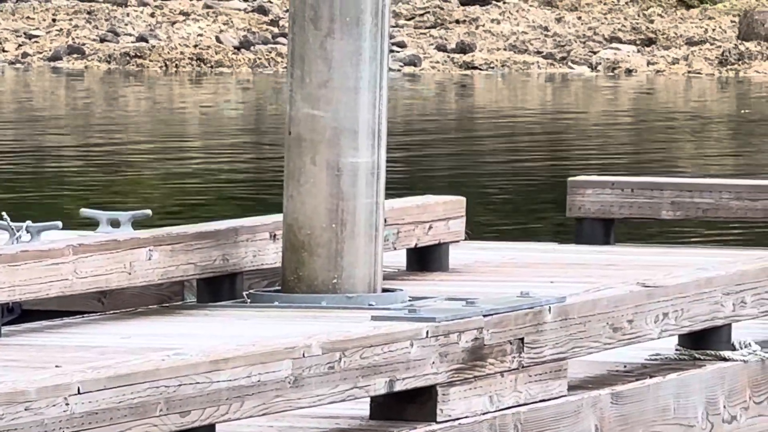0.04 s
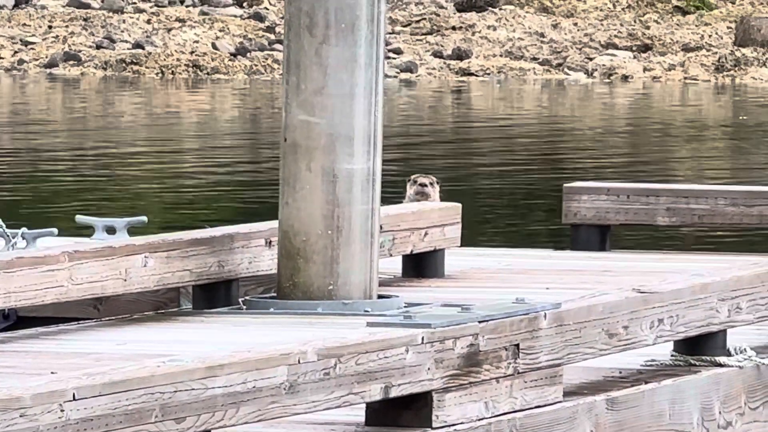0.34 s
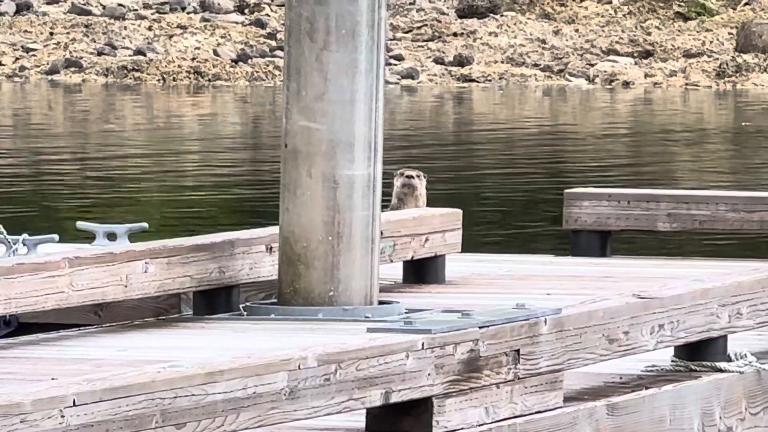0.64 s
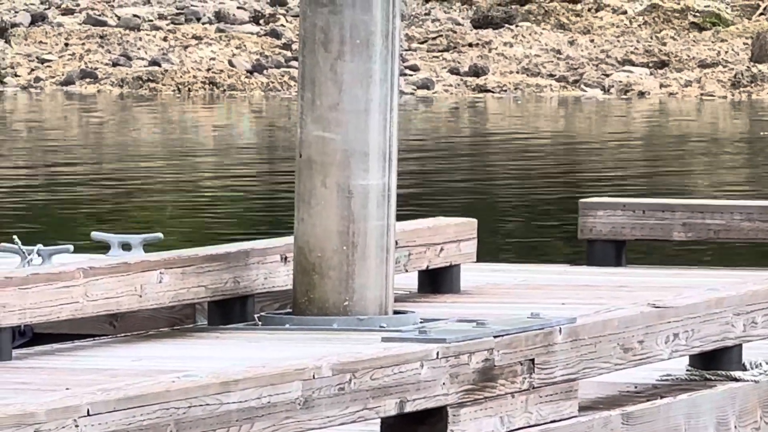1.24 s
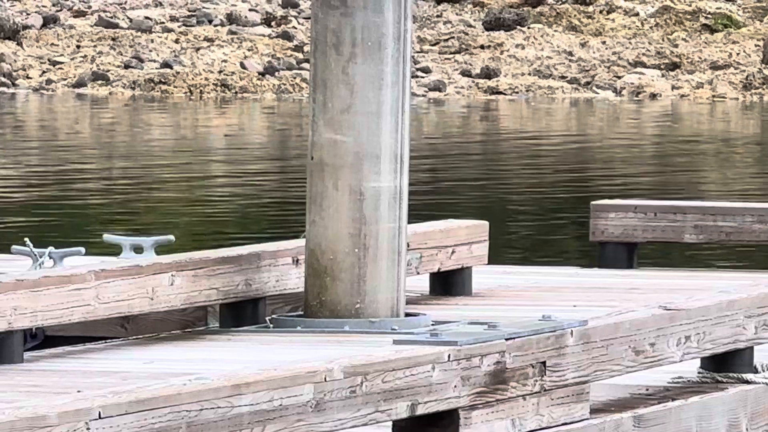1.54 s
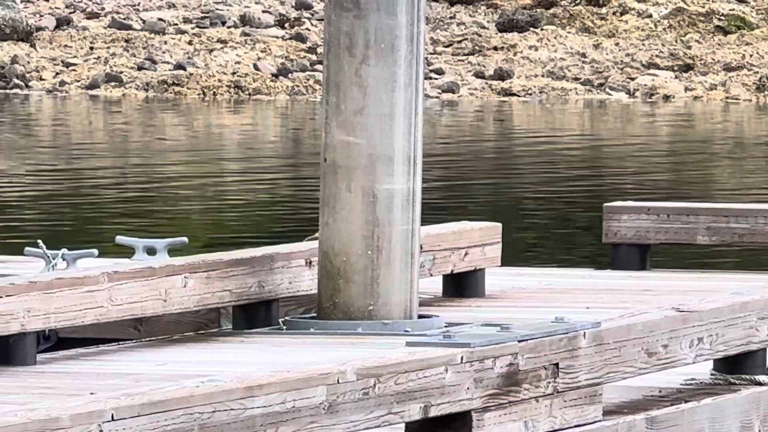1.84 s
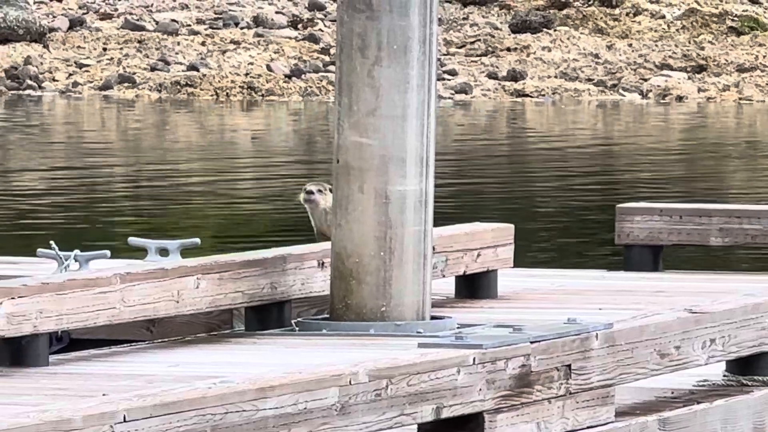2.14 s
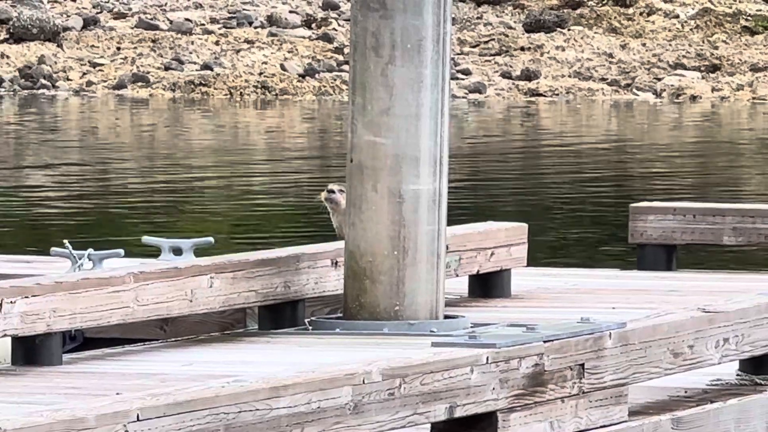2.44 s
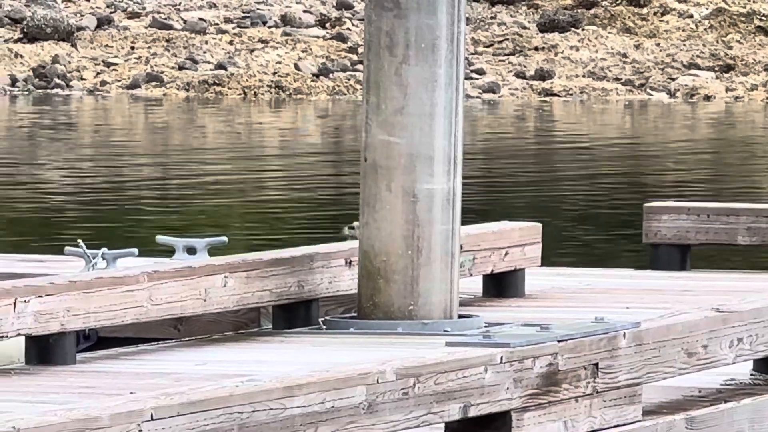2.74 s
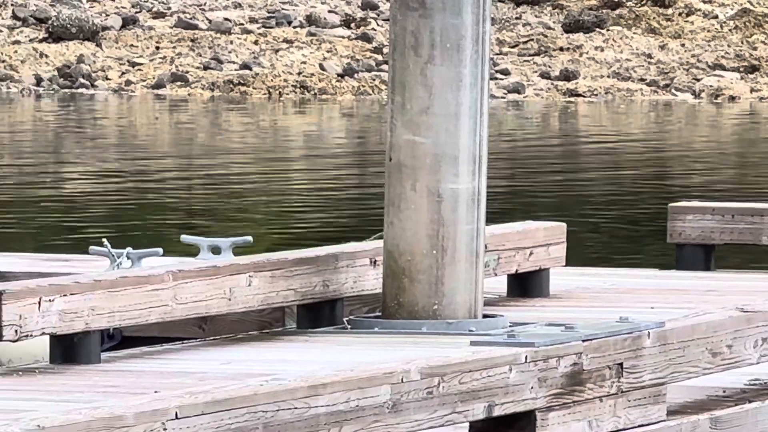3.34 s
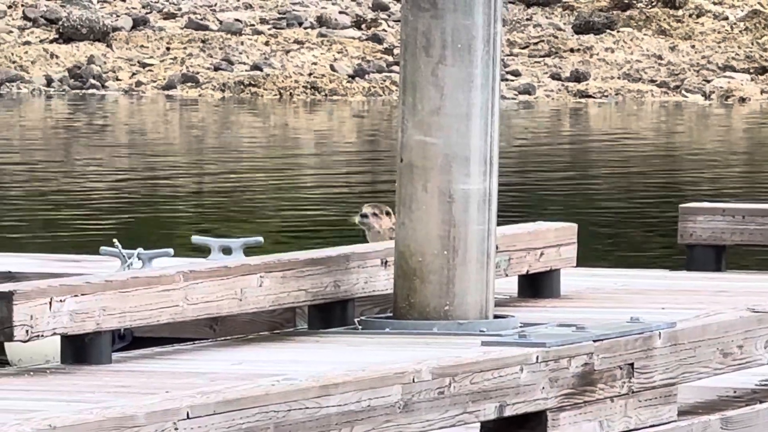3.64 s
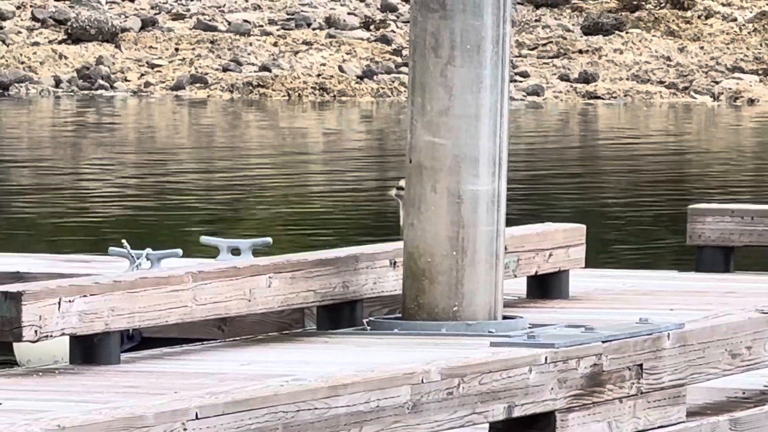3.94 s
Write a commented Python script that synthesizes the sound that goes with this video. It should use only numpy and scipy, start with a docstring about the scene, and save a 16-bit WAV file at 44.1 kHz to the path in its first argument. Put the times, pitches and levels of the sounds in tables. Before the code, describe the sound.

A breeze on the microphone grows into low, uneven buffeting beside calm water. Small plops under a dock come first, then a sharp, gritty knock nearby, with faint scuffs, a thin far-off bird whistle and a small metal clink.

```python
"""On a wooden dock over calm water, stereo microphone open to a light breeze. Water plops under the
boards, soft scuffs start close by, and a distant bird's thin whistle creeps in. Just past one second,
something near gives one sharp, gritty knock that the shore echoes. The whistle swells and the bird adds
a few slurs. The breeze grows, a small metal fitting clinks to the right, and to the end gusts rumble
and eddies puff on the microphone."""
import sys
import numpy as np
from scipy import signal
from scipy.fft import rfft, irfft, next_fast_len
from scipy.io import wavfile
from scipy.ndimage import uniform_filter1d, map_coordinates

SR = 44100
rng = np.random.default_rng(int(sys.argv[2]) if len(sys.argv) > 2 else 0)


def generate_wav(sig):
    """Save sig (samples, or channels by samples) to the path in sys.argv[1] as 16-bit PCM at SR."""
    pcm = np.round(np.clip(np.atleast_2d(sig).T, -1, 1) * 32767).astype(np.int16)
    wavfile.write(sys.argv[1], SR, pcm)


N = 176400

# Noise spectra, each relative within itself: f/Hz, level/dB
AIR_SPECTRUM = [(150, -36), (280, -6), (400, -5), (624, -7.5), (1000, -13.5), (2360, -16.5), (4240, -28),
                (5800, -26.5), (10000, -39.5), (15500, -50)]
RUMBLE_SPECTRUM = [(22, -33.5), (35, -15), (52, 5), (76, 3), (100, -1), (150, -15), (300, -30),
                   (600, -47.5), (1200, -93.5)]
FLUTTER_SPECTRUM = [(80, -19.5), (170, 10.5), (330, -5), (550, -21.5), (1500, -68)]
SCUFF_BODY_SPECTRUM = [(300, -24), (700, 1), (1700, -5), (2600, -7), (4000, -15.5), (8000, -36.5)]
SCUFF_GRIT_SPECTRUM = [(1500, -21.5), (3000, -3), (4400, 9), (6300, 6), (9300, -0.5), (11500, -42.5),
                       (15000, -4)]
CRACK_SPECTRUM = [(500, -21), (2000, -14), (5000, 15.5), (13500, 3.5)]
KNOCK_SPECTRUM = [(400, 4.5), (700, -21), (1400, -18.5), (1960, -8.5), (3110, -12), (4090, -20), (5150, 0),
                  (6470, -9.5), (13000, -21), (15500, -20)]
THUD_SPECTRUM = [(50, -4), (100, 8.5), (220, -3), (450, -19.5), (1000, -20.5), (2000, -58.5)]
# Stereo width at the microphone: f/Hz, side over mid/dB
STEREO_WIDTH = [(200, -69), (400, -15), (800, -8.5), (1400, 5), (2400, -4.5), (4400, -19.5), (6500, -11.5),
                (8200, 1.5), (15000, -2)]
# Lean of the wash and scuffs: f/Hz, left boost and right cut/dB
LEAN = [(400, 1), (1200, -2.5), (2400, 0.5)]
# Wash of the open water: t/s, level/dB
AIR_LEVELS = [(0, -66.5), (.3, -72), (1.0, -73.5), (1.5, -69.5), (1.9, -73.5), (3, -72)]
# Breeze at the microphone: t/s, level/dB
WIND_STRENGTH = [(0.0, -32.5), (0.04, -54), (0.57, -49.5), (0.63, -70), (0.699, -50), (0.9, -61),
                 (1.05, -52.5), (1.09, -61), (1.199, -39.5), (1.23, -57), (1.288, -43), (1.48, -72),
                 (1.588, -39), (1.67, -53), (2.14, -51), (2.23, -32), (2.26, -53.5), (2.331, -32.5),
                 (2.36, -47), (2.421, -25.5), (2.48, -39.5), (2.761, -25.5), (3.02, -35.5), (3.123, -32),
                 (3.158, -54.5), (3.24, -41), (3.371, -24), (3.44, -36.5), (3.499, -31), (3.78, -45.5),
                 (3.808, -30.5), (3.831, -46), (4.0, -43)]
# Plops under the boards: t/s, level/dB, starting f/Hz
PLOPS = [(0.061, -44, 341), (0.126, -55.5, 384), (.215, -51.5, 361), (0.264, -57, 393), (0.611, -58.5, 395)]
# Close rubs: t/s, rise/s, t60/s, body level/dB, grit level/dB, starting resonance f/Hz
SCUFF_STROKES = [(0.246, 0.0023, 0.07, -70.5, -91, 1198), (1.308, 0.008, 0.26, -66, -74.5, 1500),
                 (1.398, 0.017, 0.94, -68.5, -83, 1396), (1.65, 0.018, 0.094, -70, -107, 1353),
                 (2.003, 0.005, 0.35, -66, -74.5, 1450), (2.126, 0.017, 0.42, -71, -74, 1487),
                 (2.376, 0.006, 0.27, -73, -72.5, 1692), (2.415, .01, 0.13, -66, -61, 2496),
                 (2.811, 0.0079, 0.78, -68.5, -79, 1448), (3.025, 0.048, 0.54, -65, -81.5, 1502),
                 (3.547, .008, 0.2, -68, -74, 1505), (3.669, 0.03, 0.47, -68.5, -78, 1204)]
# The bird's held note: t/s, f/Hz, level/dB
WHISTLE_PATH = [(.7, 5270, -101), (1.42, 5250, -83), (1.52, 5275, -77.5), (1.6, 5270, -80),
                (1.635, 5335, -78), (1.71, 5255, -73), (1.79, 5265, -80), (1.89, 5230, -94)]
# Its short slurs: t/s, length/s, starting f/Hz, ending f/Hz, level/dB
BIRD_SLURS = [(1.79, .08, 6150, 6550, -84), (1.89, .045, 4950, 4150, -80), (1.94, .045, 5820, 5620, -79),
              (2.13, .035, 4900, 5050, -67.5)]
# Single eddies hitting the microphone: t/s, level/dB, f/Hz
STRONG_EDDIES = [(0.754, -43.5, 192), (1.032, -40, 208), (1.286, -45, 178), (1.583, -34.5, 563),
                 (1.751, -36, 287), (1.938, -44.5, 545), (2.041, -37.5, 440), (2.114, -43, 500),
                 (2.177, -38, 567), (2.319, -31.5, 197), (2.402, -24.5, 207), (2.460, -33, 543),
                 (2.500, -29, 900), (2.645, -20, 222), (2.731, -16, 148), (2.771, -19, 413),
                 (2.839, -26.5, 350), (2.856, -19.5, 230), (2.893, -18.5, 329), (2.906, -20, 210),
                 (2.986, -23.5, 256), (3.03, -29.5, 428), (3.258, -35, 403), (3.276, -28.5, 526),
                 (3.304, -27, 692), (3.316, -23.5, 120.3), (3.333, -20.5, 740), (3.378, -23, 254),
                 (3.496, -23.5, 138), (3.551, -20, 334), (3.608, -30, 259), (3.777, -25.5, 500),
                 (3.807, -28.5, 88.3), (3.865, -32, 255)]
# Resonances of the knock: f/Hz, width/Hz, relative level/dB
KNOCK_MODES = [(3020, 240, -4), (5080, 190, 3.5), (7000, 170, -5), (8100, 97, -3.5)]
# Partials of the metal fitting: f/Hz, relative level/dB, t60/s
CLINK_MODES = [(1688, 3, 0.095), (2162, -9.5, 0.07)]


def amp(db):
    """Decibels to gain."""
    return 10 ** (np.asarray(db) / 20)


def unit(x):
    """Scaled to rms 1."""
    return x / np.sqrt(np.mean(x ** 2) + 1e-20)


def along(points, hz):
    """(f/Hz, value) points read on a log axis."""
    f, v = np.transpose(points)
    return np.interp(np.log(hz + 1), np.log(f + 1), v)


def since(s):
    """Seconds since s, for every sample."""
    return np.arange(N) / SR - s


def curves(rows):
    """One value per sample for each column after the time."""
    s, *cols = np.transpose(rows)
    return [np.interp(since(0), s, c) for c in cols]


def wobble(rate):
    """A smooth random curve, rate knots a second."""
    return map_coordinates(rng.standard_normal(4096), [np.arange(N) * rate / SR], mode="wrap")


def filtered(x, response):
    """x times a response of frequency."""
    m = next_fast_len(N + SR // 4)
    return irfft(rfft(x, m) * response(np.fft.rfftfreq(m, 1 / SR)), m)[..., :N]


def shaped(gain):
    """Stereo noise of rms 1 with a gain per frequency: mono in the bass, widest in the middle."""
    def response(hz):
        return gain(hz) * np.array([np.ones_like(hz), amp(along(STEREO_WIDTH, hz))])
    mid, side = filtered(rng.standard_normal((2, N)), response)
    return unit(np.array([mid + side, mid - side]))


def noise(spectrum):
    """Stereo noise with an (f/Hz, level/dB) spectrum."""
    return shaped(lambda hz: amp(along(spectrum, hz)))


def burst(s, rise, hold, t60):
    """An envelope: straight rise from s, hold, exponential release."""
    t = since(s)
    return np.clip(t / rise, 0, 1) * np.exp(-np.log(1000) * np.maximum(t - rise - hold, 0) / t60)


def steadied(x, window_s):
    """Noise with its own slow swells divided out."""
    power = uniform_filter1d(np.mean(x ** 2, axis=0), max(int(window_s * SR), 2))
    return x / np.sqrt(np.abs(power) + 1e-9)


def air(patchy_db=2.2):
    """Faint wash of open water and shore, all around: bands swell and fade, the treble less so."""
    level_db, = curves(AIR_LEVELS)
    hz, _, bands = signal.stft(noise(AIR_SPECTRUM), SR, nperseg=1024)
    patches = uniform_filter1d(rng.standard_normal(bands.shape[1:]), size=6, axis=0)
    patches = unit(uniform_filter1d(patches, size=7, axis=1))
    swell_db = patchy_db * patches / (1 + (hz[:, None] / 5000) ** 2)
    _, wash = signal.istft(bands * amp(swell_db), nperseg=1024)
    return unit(wash[:, :N]) * amp(level_db)


def wind(rumble_db=-1, flutter_db=-10.5, flutter_growth=1.22):
    """Breeze on the microphone: one strength drives a deep rumble and a lumpier flutter above it."""
    strength_db, = curves(WIND_STRENGTH)
    rumble = steadied(noise(RUMBLE_SPECTRUM), window_s=0.052)
    rumble *= amp(strength_db + rumble_db + 3.2 * wobble(25.284))
    # The flutter grows faster than the wind, so stronger gusts are fuller.
    gust_db = strength_db.max() + flutter_growth * (strength_db - strength_db.max())
    flutter = steadied(noise(FLUTTER_SPECTRUM), window_s=0.021)
    flutter *= amp(gust_db + flutter_db + 4.4 * wobble(55))
    return rumble + flutter


def laps(climb_per_s=1.95):
    """Water under the boards, dead centre: hollow plops, each rising a little in pitch."""
    plops = np.zeros(N)
    for s, db, hz in PLOPS:
        t = since(s)
        phase = 2 * np.pi * hz * (t + climb_per_s * t * t / 2) + 1.08 * wobble(90)
        plops += amp(db) * burst(s, rise=0.0052, hold=0, t60=0.13) * np.sin(phase)
    return plops


def scuffs(hold_s=0.0061, octaves_per_s=4, climb_s=.12, resonance_db=-1.5, rough_db=2.0):
    """Soft rubs close by: a dull body, a sandy top and a resonance that climbs as the stroke speeds up."""
    body, grit, friction = noise(SCUFF_BODY_SPECTRUM), noise(SCUFF_GRIT_SPECTRUM), wobble(800)
    rubs = np.zeros((2, N))
    for s, rise, t60, body_db, grit_db, hz in SCUFF_STROKES:
        at = slice(int(s * SR), int((s + rise + t60) * SR))
        pitch = hz * 2 ** (octaves_per_s * np.minimum(since(s)[at], climb_s))
        phase = 2 * np.pi * np.cumsum(pitch) / SR
        resonance = amp(resonance_db) * np.sqrt(2) * friction[at] * np.sin(phase)
        stroke = amp(body_db) * (body[:, at] + resonance) + amp(grit_db) * grit[:, at]
        rubs[:, at] += burst(s, rise, hold_s, t60)[at] * stroke
    return rubs * amp(rough_db * wobble(250))


def bird(whistle_waver_hz=36, slur_waver_hz=160, shore_db=-5):
    """A bird far off: a thin held whistle and short buzzy slurs, blurred by the shore."""
    hz, db = curves(WHISTLE_PATH)
    first_s, last_s = WHISTLE_PATH[0][0], WHISTLE_PATH[-1][0]
    held = burst(first_s, rise=0.041, hold=last_s - first_s, t60=.03) * amp(db + 3.9 * wobble(39.9))
    song = held * np.sin(2 * np.pi * np.cumsum(hz + whistle_waver_hz * wobble(150)) / SR)
    buzz_hz = slur_waver_hz * wobble(500)
    for s, length, start_hz, end_hz, level_db in BIRD_SLURS:
        progress = np.clip(since(s) / length, 0, 1)
        pitch = start_hz + (end_hz - start_hz) * progress + buzz_hz
        song += amp(level_db) * np.sin(np.pi * progress) * np.sin(2 * np.pi * np.cumsum(pitch) / SR)
    shore = (noise(AIR_SPECTRUM) * burst(0, rise=0.014, hold=0, t60=.3))[:, :SR // 2]
    blur = unit(signal.fftconvolve(song[None], shore, axes=1)[:, :N])
    return song + amp(shore_db) * song.std() * blur


def eddy(s, hz, turn, rise_cycles=.25, fall_cycles=1.05, sag_per_cycle=0.32):
    """A brief pressure swing that slows as it passes the microphone: its samples and complex shape."""
    at = np.arange(max(int((s - 3 / hz) * SR), 0), min(int((s + 8 / hz) * SR), N))
    cycles = (at / SR - s) * hz
    envelope = 1 / (np.exp(-cycles / rise_cycles) + np.exp(cycles / fall_cycles))
    slowed_cycles = (1 - np.exp(-sag_per_cycle * cycles)) / sag_per_cycle
    return at, envelope * np.exp(2j * np.pi * (turn + slowed_cycles))


def puffs(stray_count=200, stray_hz=230, tilt_db_per_octave=-7.5, tiny_count=60, tiny_hz=490):
    """Eddies right on the microphone: strong ones, among stray and tiny ones as loud as the wind allows."""
    eddies = []  # t/s, level/dB, f/Hz
    for s, db, hz in STRONG_EDDIES:
        eddies.append((s, db, hz))
        eddies.append((s + 0.0028, db - 3, hz * 0.46))  # the slower swirl in its wake
        for lag in np.abs(rng.standard_normal(4)):  # fragments break off: the later, the lower
            eddies.append((s + 0.014 * lag, db - 12, hz * np.exp(-0.26 * lag)))
    times, strength_db = np.transpose(WIND_STRENGTH)

    def scattered(count, spread_octaves, spread_db=3):
        """Random eddies: t/s, level around the wind strength/dB, pitch offset/octaves."""
        onsets = rng.random(count) * N / SR
        octaves, extra_db = (rng.standard_normal((count, 2)) * [spread_octaves, spread_db]).T
        return zip(onsets, np.interp(onsets, times, strength_db) + extra_db, octaves)

    for s, db, octaves in scattered(stray_count, spread_octaves=.55):
        eddies.append((s, db - 11 + tilt_db_per_octave * octaves, stray_hz * 2 ** octaves))
    for s, db, octaves in scattered(tiny_count, spread_octaves=.25):
        eddies.append((s, db - strength_db.mean() - 57.5, tiny_hz * 2 ** octaves))
    mid, side = np.zeros((2, N))
    for s, db, hz in eddies:
        at, swing = eddy(s, hz, turn=rng.random())
        mid[at] += amp(db) * swing.real
        side[at] += amp(db) * swing.imag
    # Only their upper part differs between the microphone's ports.
    side = filtered(side, lambda hz: amp(1 + along(STEREO_WIDTH, hz)))
    return np.array([mid + side, mid - side])


def shore_echo(x, delay_s=.139, level_db=-22, dull_hz=12000):
    """One slightly duller reflection off the shore."""
    return filtered(x, lambda f: amp(level_db) * np.exp(-2j * np.pi * f * delay_s) / (1 + (f / dull_hz) ** 2))


def knock(s=1.178, lead_s=0.0085, hold_s=0.016, grit_db=2.6):
    """Close knock: first touch, crack, a gritty bright ring over a dull thud; the shore sends it back."""
    def strike(t60):
        return burst(s - lead_s, lead_s, hold_s, t60)

    def resonances(f):
        return np.abs(sum((-1) ** k * amp(db) * 1j * f * width / (hz * hz - f * f + 1j * f * width)
                          for k, (hz, width, db) in enumerate(KNOCK_MODES)))

    grains = amp(grit_db * wobble(450))
    ring = amp(-51.5) * strike(t60=.17) * shaped(resonances)
    crack = amp(-36.5) * burst(s, rise=.0003, hold=.001, t60=.008) * noise(CRACK_SPECTRUM)
    blow = amp(-45) * strike(t60=.14) * noise(KNOCK_SPECTRUM)
    thud = amp(-43.5) * strike(t60=.15) * steadied(noise(THUD_SPECTRUM), window_s=0.026)
    bright = (blow + ring) * grains
    return crack + bright + thud + shore_echo(bright)


def clink(s=2.538, level_db=-47.5, rise_s=0.004, drag_s=.01, rebound_s=.024, left_lag_s=0.00012):
    """A small metal fitting to the right drags, then touches again: a scrape and a rough, damped ring."""
    t = since(s) + left_lag_s * np.array([[-.5], [.5]])
    ring = 0
    for hz, db, t60 in CLINK_MODES:
        contacts = burst(s, rise_s, drag_s, t60) + amp(-8.5) * burst(s + rebound_s, rise_s, 0, t60)
        rough_gain = amp(db + 2.1 * wobble(300))
        ring += rough_gain * contacts * np.sin(2 * np.pi * hz * t + 0.4 * wobble(300))
    rub = 2 * noise(SCUFF_BODY_SPECTRUM) + noise(SCUFF_GRIT_SPECTRUM)
    scrape = amp(-27.5) * burst(s, rise_s, drag_s, t60=.1) * rub
    pan = amp([[-3], [3]])
    return amp(level_db) * (pan * ring + scrape)


def scene():
    """Everything as heard from the dock; the wash and the scuffs lean right in the middle range."""
    around = filtered(air() + scuffs(), lambda hz: amp(along(LEAN, hz) * np.array([[1], [-1]])))
    return around + wind() + puffs() + knock() + clink() + bird() + laps()


def record(dry, top_hz=15650, edge_hz=400):
    """The microphone chain passes nothing above its band limit."""
    return filtered(dry, lambda hz: np.clip((top_hz - hz) / edge_hz + .5, 0, 1))


dry = scene()
out = record(dry)
generate_wav(out)
```